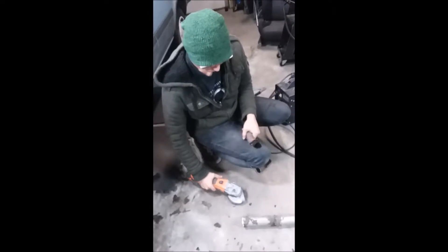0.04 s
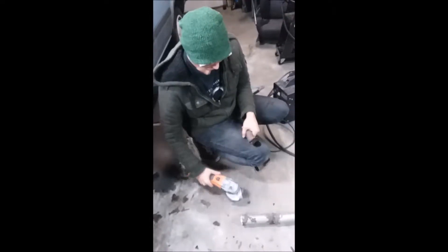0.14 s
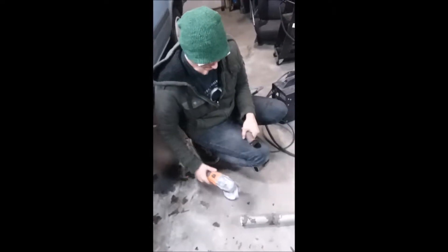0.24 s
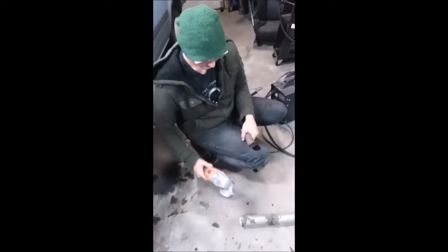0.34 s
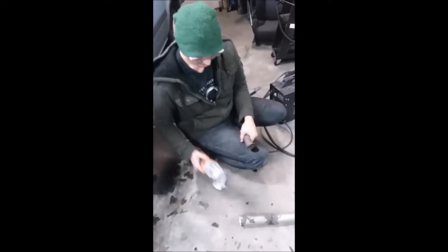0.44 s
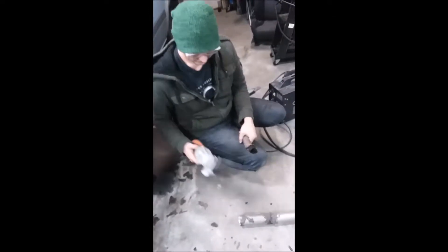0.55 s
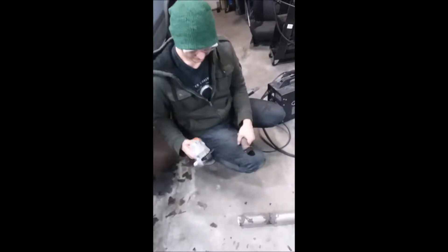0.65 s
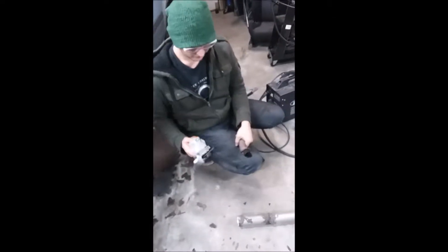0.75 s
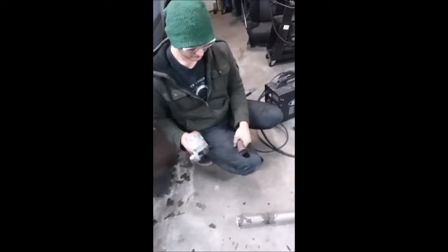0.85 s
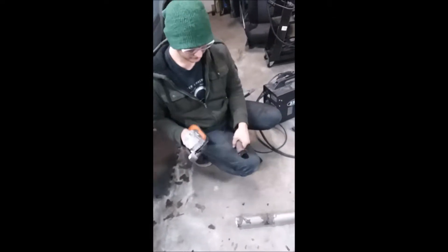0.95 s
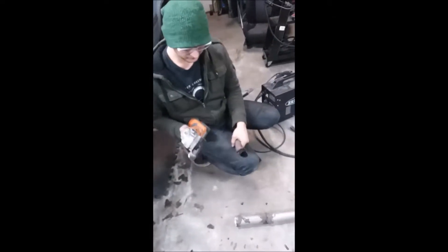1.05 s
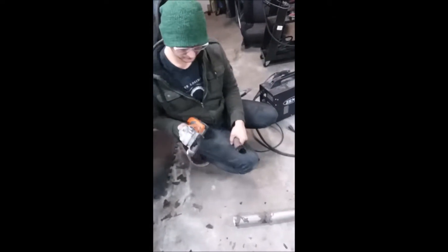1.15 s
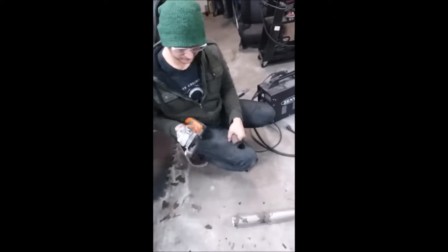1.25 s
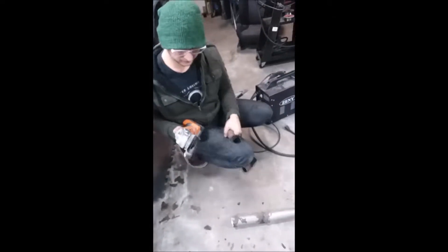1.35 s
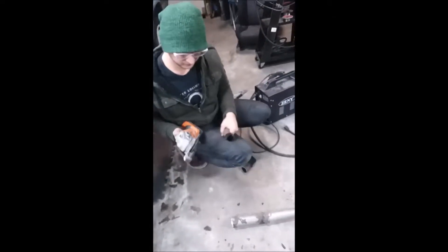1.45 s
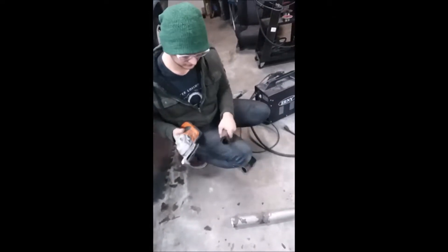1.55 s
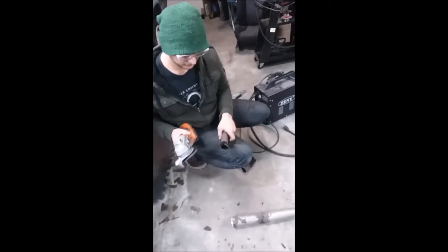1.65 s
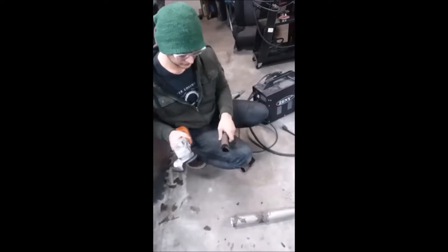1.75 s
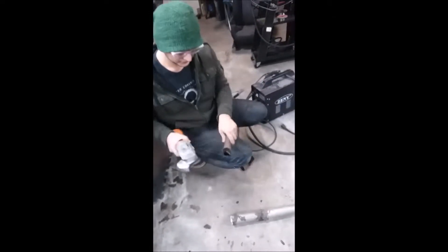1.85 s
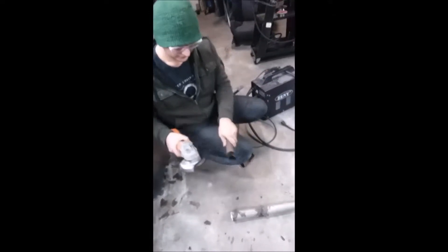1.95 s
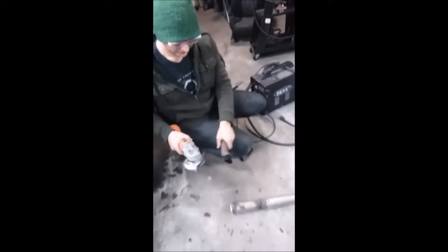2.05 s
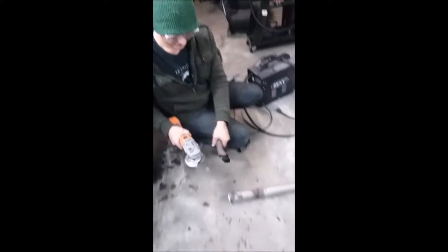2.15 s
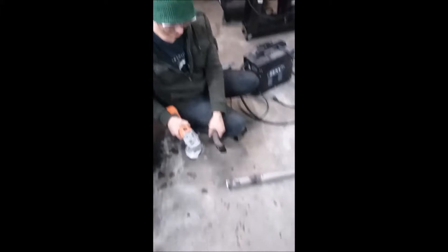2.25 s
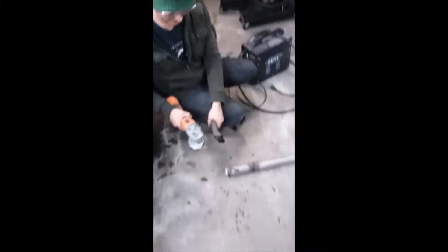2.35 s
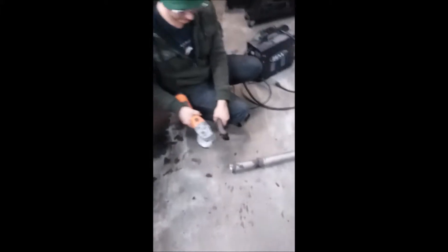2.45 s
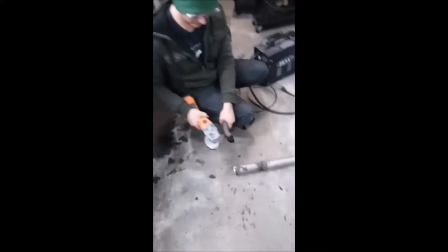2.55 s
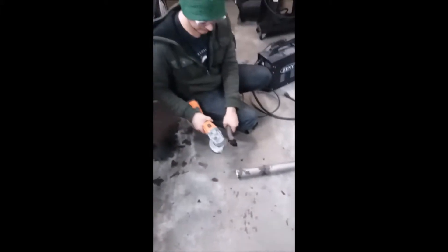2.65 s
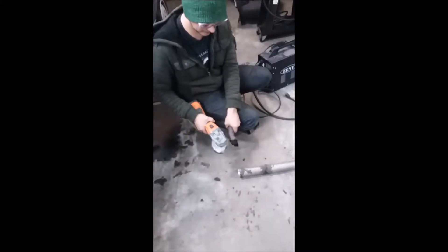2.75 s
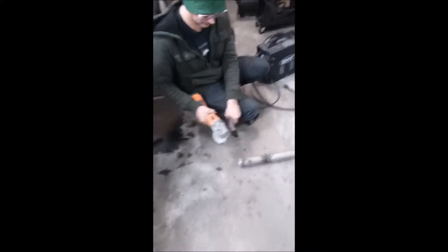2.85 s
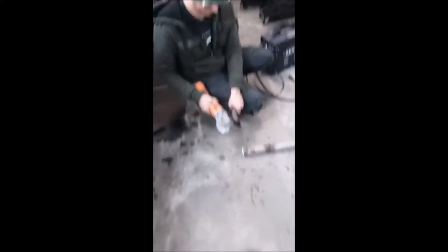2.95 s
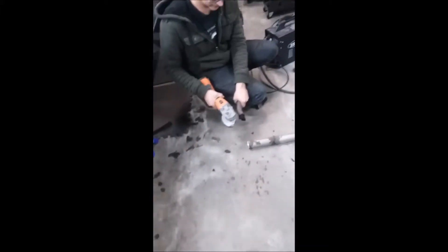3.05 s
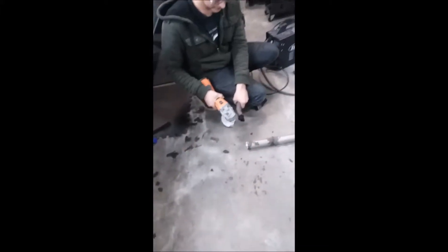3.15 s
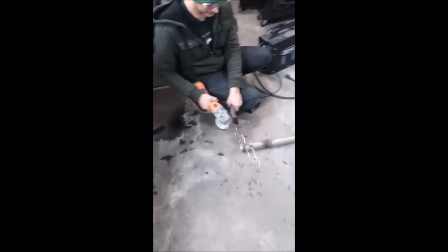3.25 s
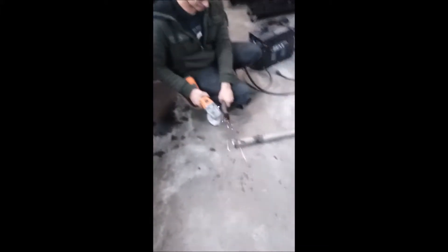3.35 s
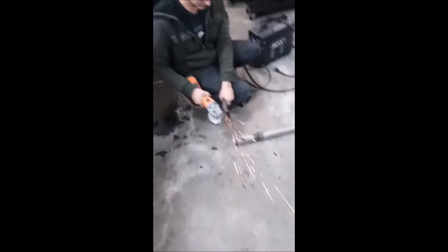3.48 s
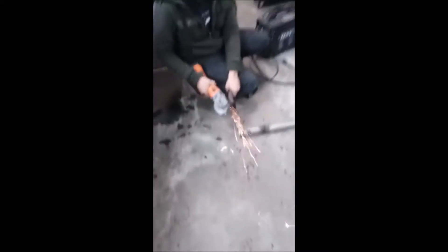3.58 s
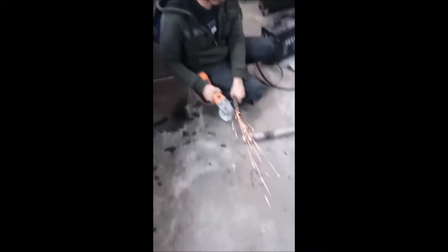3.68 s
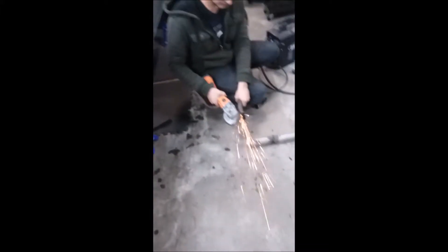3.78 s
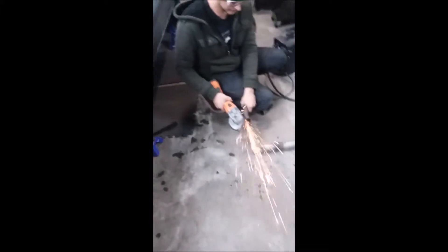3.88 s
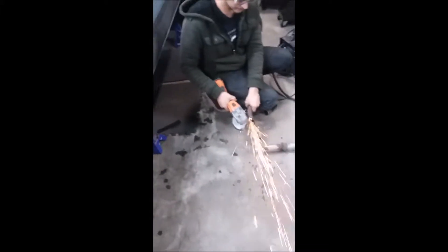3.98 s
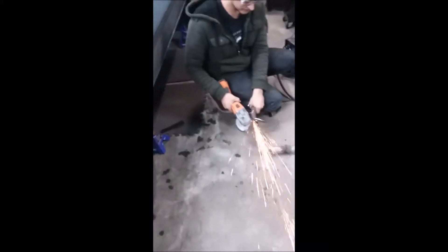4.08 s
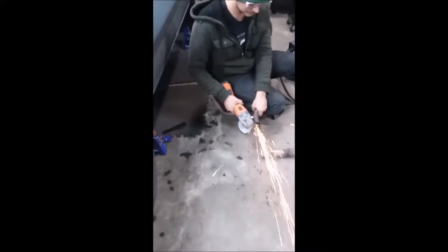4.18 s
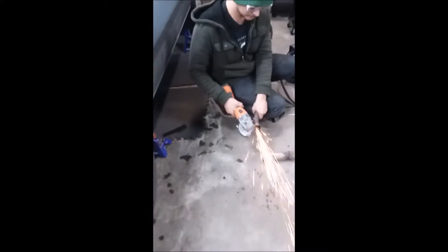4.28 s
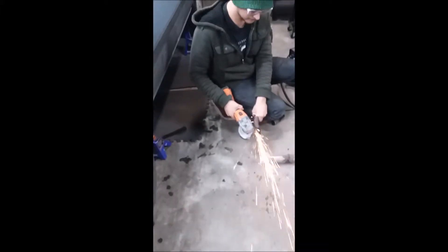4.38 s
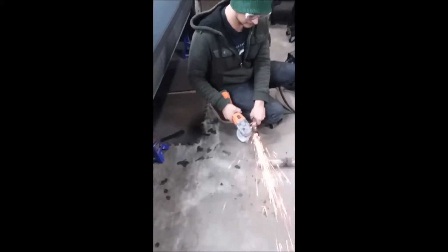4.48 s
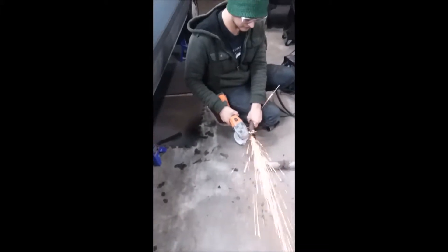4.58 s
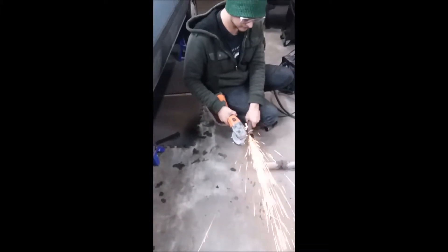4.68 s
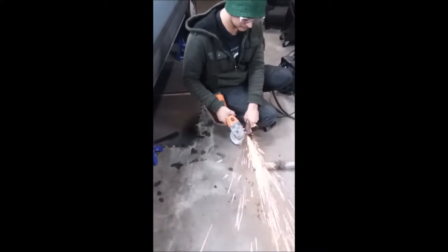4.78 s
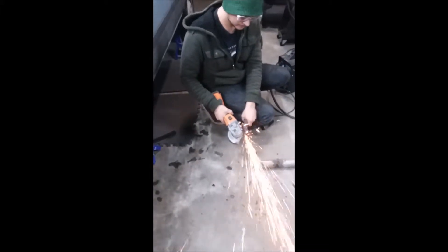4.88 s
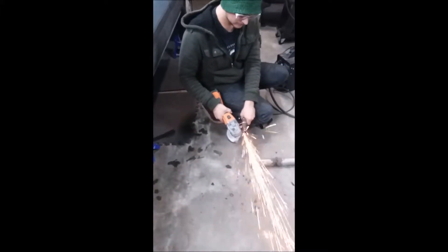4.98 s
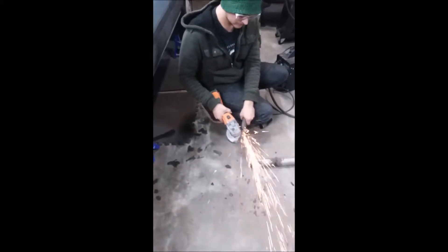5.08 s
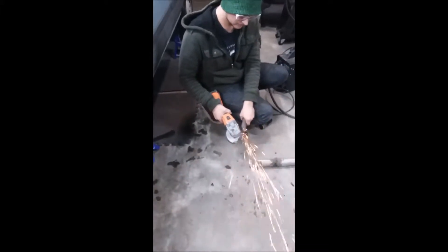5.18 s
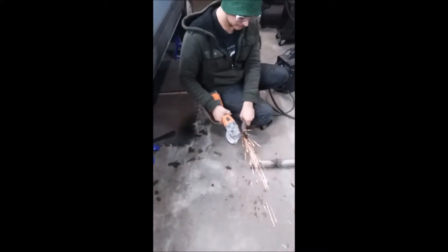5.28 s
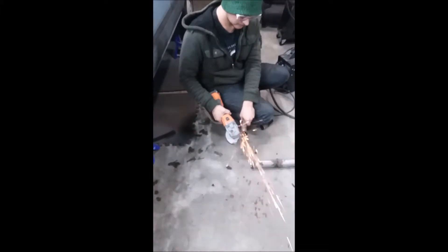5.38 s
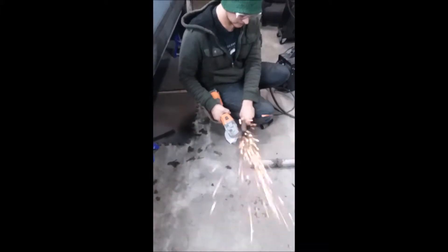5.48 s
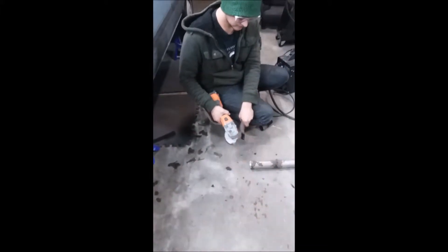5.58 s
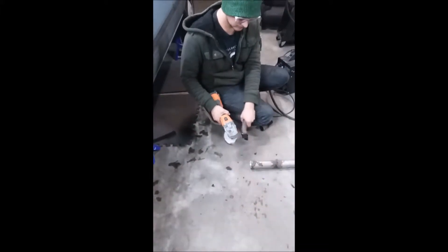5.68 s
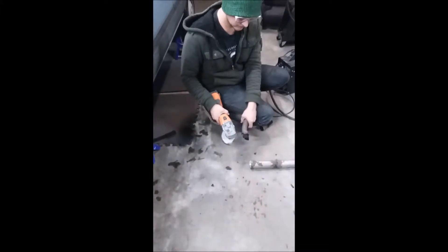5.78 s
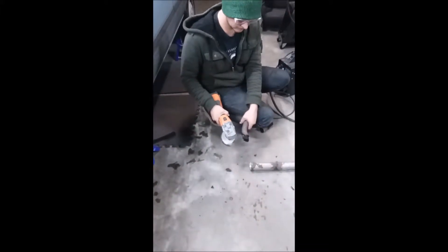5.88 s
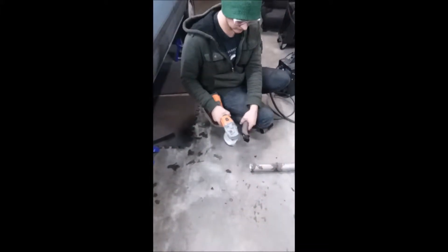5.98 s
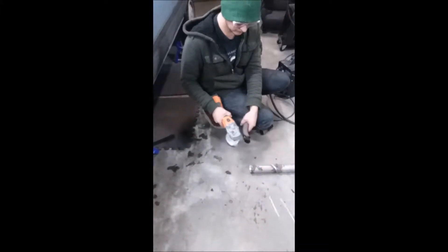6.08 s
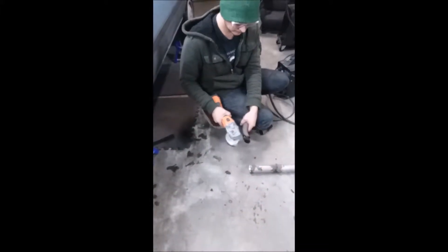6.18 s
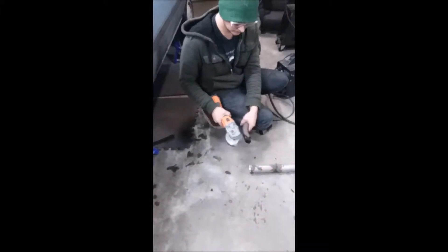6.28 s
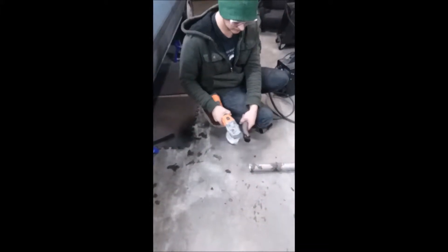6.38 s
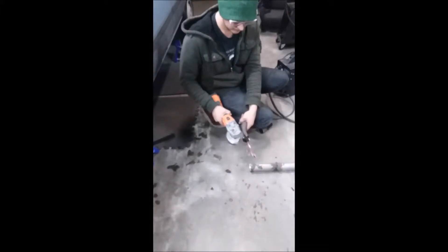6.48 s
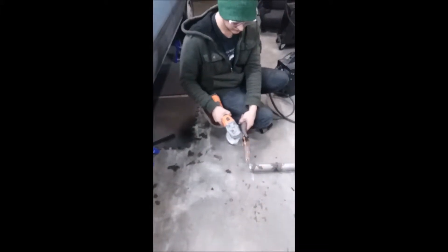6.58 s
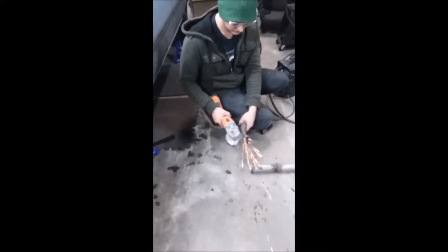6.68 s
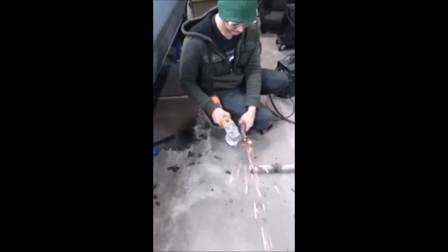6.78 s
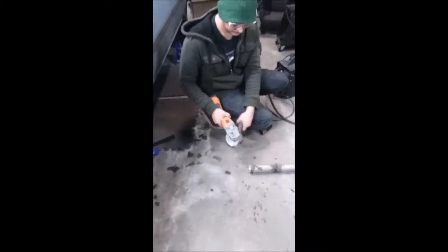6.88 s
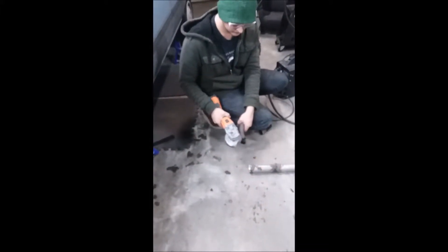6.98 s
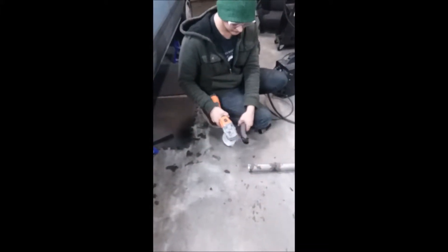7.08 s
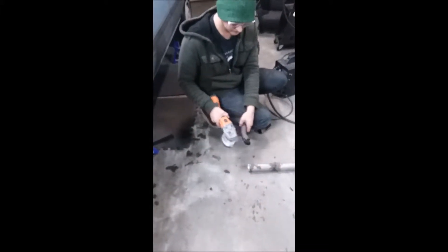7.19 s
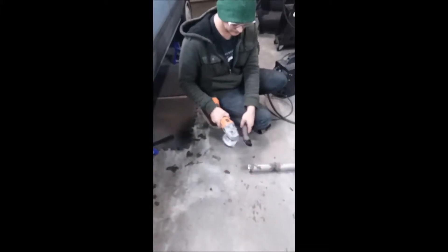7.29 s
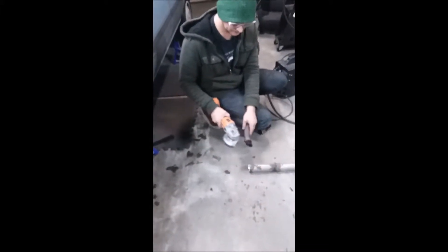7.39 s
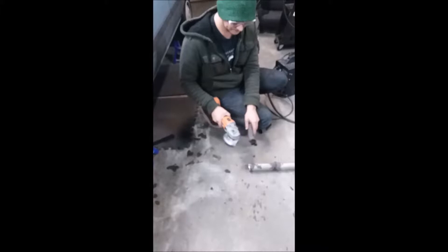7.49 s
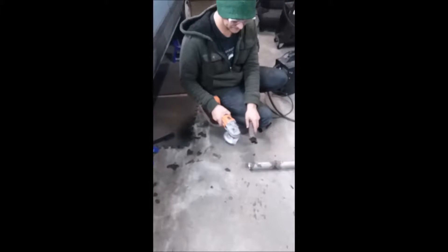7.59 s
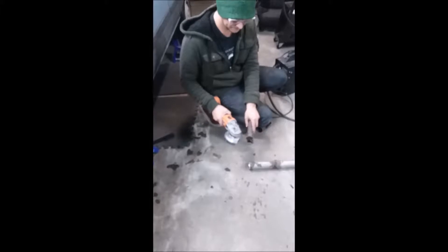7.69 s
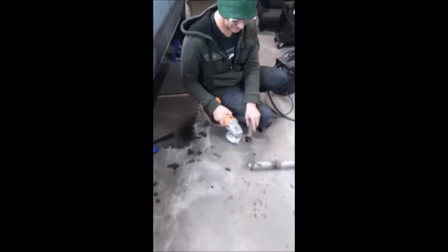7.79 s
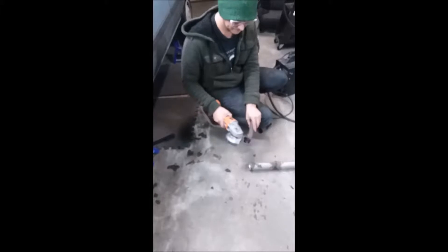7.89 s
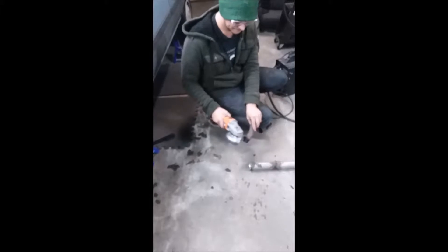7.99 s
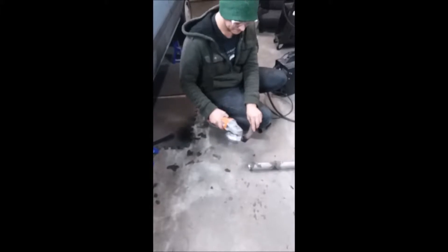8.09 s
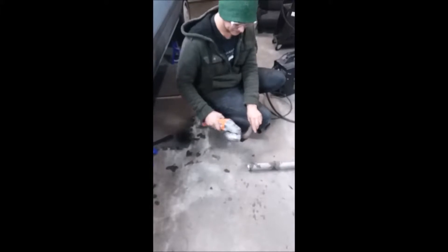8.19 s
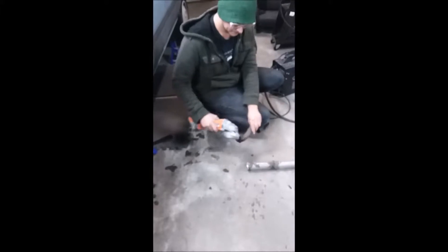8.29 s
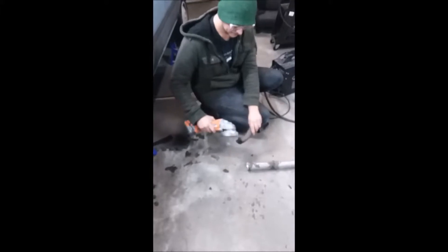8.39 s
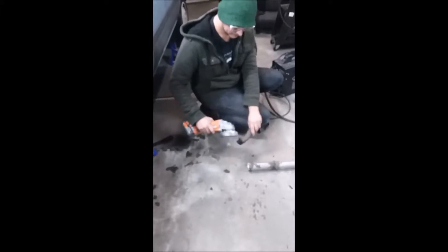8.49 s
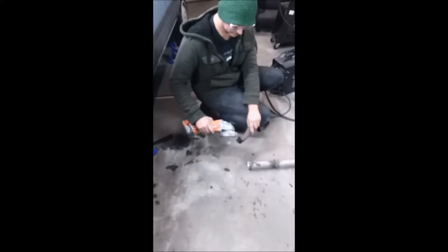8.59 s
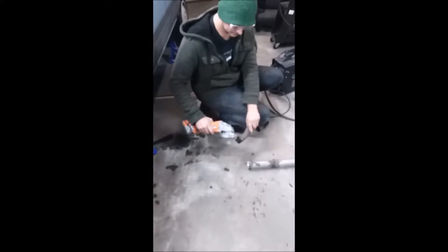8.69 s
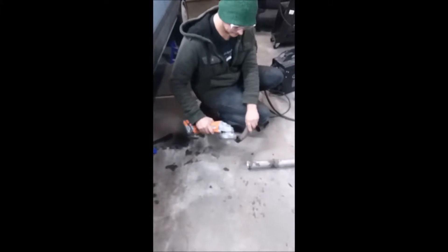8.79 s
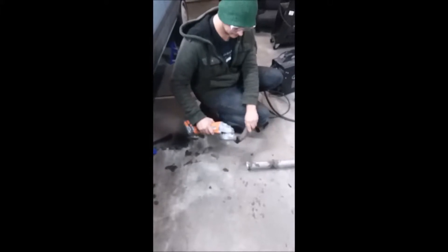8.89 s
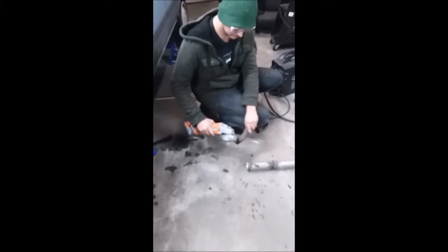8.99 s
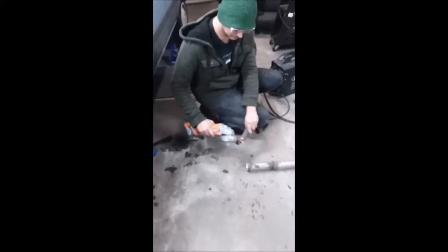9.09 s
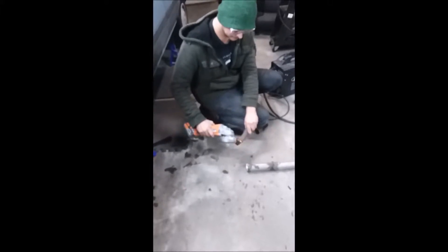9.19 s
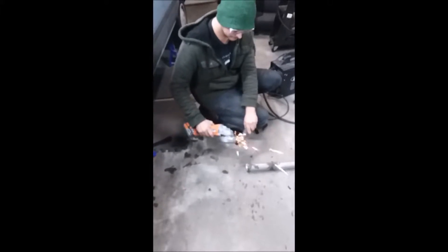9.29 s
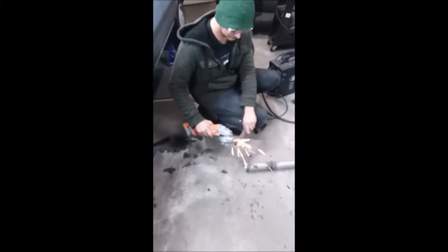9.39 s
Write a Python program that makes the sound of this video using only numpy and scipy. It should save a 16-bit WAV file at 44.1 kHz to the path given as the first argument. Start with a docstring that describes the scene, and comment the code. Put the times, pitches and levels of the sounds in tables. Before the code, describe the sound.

In a workshop with a short room decay, faint rumble and soft sleeve rubs precede sharp switch clicks. An electric angle grinder howls up to speed and settles into whine, rushing air and gear rattle. It grinds steel pipe in one long rasp, a brief touch and a last pass at the end. Close stereo microphone; sparks and air buffet the right side.

```python
"""In a workshop, two microphone ports hear an angle grinder picked up, switched on and pressed three times to steel pipe.
Fan, slot and gear tones follow the motor's turns; filtered noise makes the rushing air, and backlash knocks
excite the gear head. On the pipe the speed sags, and a noise pattern nearly alike on every disc turn
makes the grit rasp and rings disc and pipe. The stream of sparks and air buffets the right port alone.
Cloth rubs, clicks, a low hum and faint rumble open the scene."""
import sys
import numpy as np
from scipy import signal
from scipy.fft import rfft, irfft, next_fast_len
from scipy.io import wavfile

SR = 44100
rng = np.random.default_rng(int(sys.argv[2]) if len(sys.argv) > 2 else 0)


def wav_out(sig):
    """Save sig, one row per channel (or a flat mono array), as 16-bit PCM at SR to the path in sys.argv[1]."""
    wavfile.write(sys.argv[1], SR, np.round(np.clip(np.atleast_2d(sig).T, -1, 1) * 32767).astype(np.int16))


N = 416304
TIME = np.arange(N) / SR  # [s]
GEAR_RATIO = 13 / 37  # disc turns per motor turn


def from_db(db):
    """Decibels to gain."""
    return 10 ** (np.asarray(db) / 20)


def rms_one(x):
    """Scale to unit power."""
    return x / np.sqrt(np.mean(x ** 2) + 1e-20)


def in_time(rows):
    """Interpolate the columns of a timed table at every sample."""
    s, *columns = np.transpose(rows)
    return [np.interp(TIME, s, column) for column in columns]


def gate(start, end, edge=0.005):
    """One between two moments [s], with short ramps."""
    rise = np.clip((TIME - start) / edge, 0, 1)
    fall = np.clip((end - TIME) / edge + 1, 0, 1)
    return rise * fall


def drift(rate_hz):
    """Slow chance with unit spread: noise through two equal low-pass poles, computed every 40 samples."""
    step = 40
    pole = np.exp(-2 * np.pi * rate_hz * step / SR)
    noise = rng.standard_normal(N // step + 2002)
    slow = signal.lfilter([1], [1, -2 * pole, pole * pole], noise)[2000:]  # skip the settling
    return np.interp(np.arange(N) / step, np.arange(len(slow)), rms_one(slow))


def colour(x, spectrum):
    """Filter by a (frequency [Hz], level [dB]) outline, straight on a logarithmic frequency axis."""
    hz, db = np.transpose(spectrum)
    size = next_fast_len(N)
    bins_hz = np.maximum(np.arange(size // 2 + 1) * SR / size, 1)
    gain = from_db(np.interp(np.log(bins_hz), np.log(hz), db))
    return irfft(rfft(x, size) * gain, size)[..., :N]


def resonate(x, modes):
    """Parallel resonances, each applied twice for steep skirts."""
    out = 0
    for hz, width_hz, db in modes:
        r = np.exp(-2 * np.pi * width_hz / SR)
        edge = (1 - r * r) / 2
        section = [edge, 0, -edge, 1, -2 * r * np.cos(2 * np.pi * hz / SR), r * r]
        out = out + from_db(db) * signal.sosfilt([section, section], x + 1e-18)
    return out


def bursts(events, decay_s):
    """An envelope that jumps at each event and dies away exponentially."""
    kicks = np.zeros(N)
    for s, db in events:
        kicks[round(s * SR)] = from_db(db)
    return signal.lfilter([1], [1, -np.exp(-1 / (decay_s * SR))], kicks + 1e-18)


def swells(events):
    """An envelope that rises and falls like a bell around each event."""
    return sum(from_db(db) * np.exp(-((TIME - s) / half_s) ** 2) for s, half_s, db in events)


def pan(x, left_db):
    """Level tilt between the ports, left minus right."""
    return x * from_db([[left_db / 2], [-left_db / 2]])


def balance(x, outline):
    """Level tilt between the ports, band by band."""
    ports = []
    for port, side in zip(x, (1, -1)):
        tilt = [(hz, side * db / 2) for hz, db in outline]
        ports.append(colour(port, tilt))
    return np.array(ports)


ROOM_T60_S, ROOM_DB = 0.29, -0.5  # decay time; base tail level against the direct sound, before wet_db


def workshop(x, wet_db=0.0, late_samples=4):
    """Direct sound reaches the left port a few samples late; each port gets its own diffuse, decaying tail."""
    t = TIME[:SR // 2]
    tail = rng.standard_normal((2, len(t))) * from_db(-60 * t / ROOM_T60_S) * (t > .003)
    response = from_db(ROOM_DB + wet_db) * rms_one(tail) / np.sqrt(len(t))
    response[0, late_samples] += 1
    response[1, 0] += 1
    return signal.oaconvolve(x[None], response, axes=1)[:, :N]


# the free motor gains speed evenly, levels off, and creeps up a little as the grease warms
SWITCH_ON_S = 1.34
FREE_TURNS_PER_S, ACCELERATION_TURNS_PER_S2, KNEE_SHARPNESS = 336.55, 742, 7.8
COLD_LOSS_TURNS_PER_S, WARM_UP_S = 5.9, 1.9
INERTIA_S = .06  # time constant with which the speed follows the drag of the work


def motor_speed(drag):
    """Turns per second without load, and the turns per second lost to the work after inertia smooths the drag."""
    running_s = np.maximum(TIME - SWITCH_ON_S, 0)
    top = FREE_TURNS_PER_S - COLD_LOSS_TURNS_PER_S * np.exp(-running_s / WARM_UP_S)
    ramp = ACCELERATION_TURNS_PER_S2 * running_s / top
    free = top * ramp / (1 + ramp ** KNEE_SHARPNESS) ** (1 / KNEE_SHARPNESS)
    keep = np.exp(-1 / (INERTIA_S * SR))
    sag = signal.lfilter([1 - keep], [1, -keep], drag)
    return free, sag


def tone(turns, order, flutter_db, wobble):
    """One multiple of the motor speed, wavering a little differently at each port."""
    phase = 2 * np.pi * order * turns + wobble * drift(21)
    ports = [np.sin(phase + 0.84 * drift(4.3)) * from_db(flutter_db * drift(7.3)) for port in range(2)]
    return np.sqrt(2) * np.array(ports)


# fan whine at 8 times motor speed, its level uneven over time, before gain and speed:
# (time [s], level [dB])
FAN_WHINE = [(1.8, -31), (1.876, -18.5), (2.256, -43), (2.43, -24), (2.64, -32), (2.78, -24),
             (3.026, -30.5), (3.25, -33), (5.65, -47.5), (6.72, -33.5), (7.15, -36), (7.18, -40.5),
             (8.21, -27.5), (8.74, -38.5), (9.0, -31.5), (9.15, -56), (9.248, -30), (9.44, -33.5)]
# its lower octave at 4 times motor speed, before gain and speed: (time [s], level [dB])
LOWER_FAN_WHINE = [(1.82, -29.5), (2.14, -29), (2.29, -46), (2.37, -24), (3.69, -48.5), (6.17, -45.5),
                   (6.96, -32), (7.57, -53.5), (8.91, -32.5), (9.44, -43.5)]
# other motor and gear tones: (multiple of motor speed, level against the air gain at full speed [dB])
MOTOR_ORDERS = [(.76, -28.5), (2, -13), (2.74, -9.5), (13, -3.5), (14, -18), (16, -3.5), (37, -25),
                (39, -28), (41, -37), (43, -31)]
WHINE_GAIN_DB, LOWER_WHINE_GAIN_DB = 2.5, -5.5
WHINE_DB_PER_LOST_TURN = -0.44  # dB for each turn per second lost to the work


def whine(turns, speed, sag, air):
    """Fan, slot and gear tones; the fan's two rise steeply with speed and fade when the motor labours."""
    pace = speed / speed.max()
    eighth = from_db(in_time(FAN_WHINE)[0] + WHINE_GAIN_DB) * pace ** 8
    fourth = from_db(in_time(LOWER_FAN_WHINE)[0] + LOWER_WHINE_GAIN_DB) * pace ** 3
    fan = fourth * tone(turns, order=4, flutter_db=6.5, wobble=0.4)
    fan = fan + eighth * tone(turns, order=8, flutter_db=1.0, wobble=0.16)
    rest = sum(from_db(db) * tone(turns, order, flutter_db=4.5, wobble=0.67) for order, db in MOTOR_ORDERS)
    return pan(fan * from_db(WHINE_DB_PER_LOST_TURN * sag) + air * rest * pace ** 6, left_db=0.5)


# outline of the cooling air before scaling: (frequency [Hz], level [dB per Hz])
AIR_SPECTRUM = [(30, -52), (60, -38), (130, -23.5), (250, -12.5), (420, -3.5), (700, -1.5), (1150, 5),
                (1900, 3), (2700, 2), (3700, 6.5), (5400, -7.5), (6800, -15), (9000, -21), (13000, -11),
                (16000, -15)]
# air at the two ports: (frequency [Hz], left minus right [dB])
AIR_PORT_BALANCE = [(500, -4.5), (1300, -7), (2500, -1), (4500, -4), (6500, 13.5), (8000, 14.5),
                    (10000, 0.5), (15000, -5)]
AIR_TOP_HZ = 6200  # the hiss above this grows most with speed


def air_rush(turns, speed, air):
    """Cooling air torn by the fan, throbbing lightly with rotor and disc; its top hiss grows with speed."""
    throb = 1 + 0.038 * np.cos(2 * np.pi * turns) + 0.18 * np.cos(2 * np.pi * GEAR_RATIO * turns)
    bright = rms_one(colour(rng.standard_normal(N), AIR_SPECTRUM))
    dull = colour(bright, [(AIR_TOP_HZ, 0), (1.5 * AIR_TOP_HZ, -12)])
    hiss = dull + (bright - dull) * (speed / speed.max()) ** 2
    rush = hiss * throb * from_db(1.0 * drift(33))
    return balance(workshop(from_db(5.5) * air * rush), AIR_PORT_BALANCE)


# resonances of the gear head: (frequency [Hz], width [Hz], level [dB])
GEAR_HEAD_MODES = [(2686, 350, 6.5), (3760, 100, 2), (3962, 530, 12), (4387, 260, 5.5), (4644, 550, 5),
                   (4880, 490, -4)]


def gear_rattle(turns, level, knock_s=0.0015, slop=.14):
    """With backlash the teeth knock unevenly about once a disc turn, each a short chatter in the gear head."""
    swing = np.maximum.accumulate(np.floor(GEAR_RATIO * turns + slop * drift(45)))
    knocks = np.diff(swing, prepend=swing[0]) * rng.uniform(.3, 1.3, N)
    knocks += (rng.random(N) < 25 / SR) * 1.02  # stray rebounds, 25 a second on average
    decay = np.exp(-1 / (knock_s * SR))
    chatter = np.tanh(signal.lfilter([1], [1, -decay], knocks + 1e-18)) + .05
    head = rms_one(resonate(chatter * rng.standard_normal(N), GEAR_HEAD_MODES))
    head = 4 * np.tanh(head / 4)  # the free play of the teeth limits how hard the head can be driven
    head = signal.sosfilt(signal.butter(4, 6500, fs=SR, output="sos"), head)
    return pan(workshop(from_db(1.5) * level * head, wet_db=-4.0), left_db=-16.5)


# disc on steel, one table for each pass, levels before mixing:
# (time [s], drag [motor turns per s], grit hiss [dB], ringing of disc and pipe [dB])
STEEL_PASSES = [
    [(3.26, 0, -44, -56), (3.44, 3.5, -29.5, -28), (3.66, 16, -28.5, -21.5), (3.82, 25.5, -27, -28.5),
     (4.2, 24, -29.5, -26.5), (4.72, 30, -30.5, -25.5), (4.97, 29.5, -32, -26.5), (5.22, 21.5, -33, -29.5),
     (5.56, 16, -31, -28.5)],
    [(6.53, 0, -44, -41), (6.62, 3.5, -33.5, -28), (6.82, 9, -27, -22.5), (6.96, 1.5, -43, -34.5)],
    [(9.04, 2, -33, -31), (9.44, 5.9, -35.5, -25.5)],
]


def spells():
    """Drag, hiss gain and ringing gain of the passes, each acting only within its own span."""
    out = 0
    for rows in STEEL_PASSES:
        drag, hiss_db, ringing_db = in_time(rows)
        columns = np.array([drag, from_db(hiss_db), from_db(ringing_db)])
        out = out + columns * gate(rows[0][0], rows[-1][0])
    return out


def disc_face(turns, memory, lumpy_db, fresh, size=400, order=4):
    """Grit passing the steel: the same rim returns each turn, slowly worn into a new one, plus fresh fractures."""
    angle = GEAR_RATIO * turns  # disc turns
    rims = rng.standard_normal((int(angle[-1]) + 200, size))
    rims = signal.lfilter([1], [1, -min(memory, .99)], rims, axis=0)
    high_spots = rms_one(signal.resample(rng.standard_normal(size // 25), size))
    rims = rims * from_db(lumpy_db * high_spots)
    track = signal.resample_poly(rims.ravel(), order, 1)
    rasp = np.interp(angle * size * order, np.arange(len(track)), track)
    return (rms_one(rasp) + fresh * rng.standard_normal(N)) * (1 + 0.093 * np.cos(2 * np.pi * angle))


# the disc bites or skips on the steel, mostly as it touches down, before the spray and ring gains:
# (time [s], peak [dB])
DISC_BITES = [(3.2575, -18.5), (3.3085, -21), (3.3328, -20), (3.3717, -22), (3.614, -30.5), (6.13, -24),
              (6.536, -21.5), (6.59, -22), (6.912, -22), (6.9343, -17.5), (9.1114, -22), (9.284, -29)]
# outline of the grit hiss before scaling: (frequency [Hz], level [dB per Hz])
GRIT_SPECTRUM = [(300, -8.5), (1000, -2.5), (2200, -4), (5500, -1), (7000, 0), (8800, -7.5), (10200, 5),
                 (12400, 9), (13500, 5.5), (15000, 9.5), (16000, 4.5)]
# resonances of disc and pipe in contact: (frequency [Hz], width [Hz], level [dB])
DISC_AND_PIPE_MODES = [(2860, 180, -4), (3372, 194, 2), (3540, 125, 0), (3957, 217, -0.5), (4440, 79, -15),
                       (5100, 58, -8.5)]
# grit spray at the two ports: (frequency [Hz], left minus right [dB])
GRIT_PORT_BALANCE = [(1000, -13.5), (5000, -23), (7500, 9.5), (9000, 5), (11000, 1.5), (12500, -3),
                     (15000, -6)]
BITE_S, BITE_SPRAY_DB, BITE_RING_DB = .0045, -4.0, -1.0  # decay; gains of a bite in hiss and ringing


def grinding(turns, hiss, ringing):
    """The grit hisses directly and sets disc and pipe ringing; bites and skips are short hard bursts."""
    bite = bursts(DISC_BITES, decay_s=BITE_S)
    grit = rms_one(colour(disc_face(turns, memory=0.8, lumpy_db=4.0, fresh=0.43), GRIT_SPECTRUM))
    face = disc_face(turns, memory=0.933, lumpy_db=3.5, fresh=0.39)
    body = rms_one(resonate(face, DISC_AND_PIPE_MODES))
    spray = workshop(grit * (from_db(-1.0) * hiss + from_db(BITE_SPRAY_DB) * bite))
    ring = workshop(body * (ringing + from_db(BITE_RING_DB) * bite))
    return balance(spray, GRIT_PORT_BALANCE) + pan(ring, left_db=-5.0)


# tones that strain out during spin-up, before housing and effort: (multiple of motor speed, level [dB])
STRAIN_ORDERS = [(2, -23), (4, -43), (12, -39), (13, -29), (14, -35), (15, -28.5), (26, -24), (32, -19)]
# how well the housing radiates, for the howl here and the brushes below: (frequency [Hz], level [dB])
HOUSING_RADIATION = [(250, -38), (600, -6), (1200, -24), (2000, 14.5), (2650, 11), (3100, 10.5), (3800, 14),
                     (5200, 4.5), (7000, -3.5), (8500, -26)]
HOWL_DB = -6  # gain at full torque and speed


def spin_up(turns, speed, torque):
    """The gears howl roughly while they accelerate the disc; the higher multiples waver most."""
    howl = 0
    for order, db in STRAIN_ORDERS:
        level = from_db(db + 3.1 * drift(56))
        howl = howl + level * np.sin(2 * np.pi * order * turns + 0.1 * order * drift(34))
    effort = from_db(HOWL_DB) * torque ** 0.39 * (speed / speed.max()) ** 1.84
    return pan(workshop(colour(howl, HOUSING_RADIATION) * effort), left_db=-7.0)


INRUSH_DB, INRUSH_BUZZ, MAINS_HZ = -37, 0.3, 60  # dry level at full torque; depth of the mains pulsing


def inrush(torque):
    """The starting current makes the brushes rasp through the housing, pulsing twice in each mains cycle."""
    sparks = rng.standard_normal(N) * (1 + INRUSH_BUZZ * np.cos(4 * np.pi * MAINS_HZ * TIME))
    rasp = rms_one(colour(sparks, HOUSING_RADIATION)) * torque * from_db(INRUSH_DB)
    return pan(workshop(rasp, wet_db=0.5), left_db=-10.5)


# gusts when the spark stream points at the port, before gain: (time [s], half length [s], peak [dB])
PORT_GUSTS = [(3.275, 0.014, -36), (3.345, 0.01, -29.5), (3.54, 0.11, -37.5), (3.81, 0.2, -36.5),
              (4.41, 0.21, -37.5), (4.85, 0.24, -39), (5.18, 0.17, -37), (6.562, .02, -36),
              (6.9, 0.041, -33)]
# single hard puffs, before noise, filter and gain: (time [s], peak [dB])
PORT_PUFFS = [(3.266, -19), (3.335, -18), (3.577, -13.5), (3.735, -12.5), (3.781, -14.5), (4.35, -20),
              (4.398, -12), (4.497, -15.5), (4.782, -17), (5.137, -13), (5.2, -16)]
# outline of the gusts before scaling: (frequency [Hz], level [dB per Hz])
GUST_SPECTRUM = [(15, -45), (25, -26), (97, 0), (358, -10), (442, -10), (487, -15), (644, -8.5), (700, -17),
                 (910, -20), (1540, -120)]


def buffeting():
    """Lumpy gusts and single puffs of pressure on the right microphone port alone."""
    lumpy = rng.standard_normal(N) * from_db(5.8 * drift(41))
    gusts = rms_one(colour(lumpy, GUST_SPECTRUM)) * swells(PORT_GUSTS)
    band = signal.butter(1, [90, 600], "band", fs=SR, output="sos")
    pressure = bursts(PORT_PUFFS, decay_s=0.0079) * (1 + 1.5 * rng.standard_normal(N))
    puffs = signal.sosfilt(np.vstack([band, band]), pressure)
    return (from_db(8.5) * gusts + from_db(4.5) * puffs) * np.array([[0], [1]])


# sleeve and hand rub as the tool is lifted, before flutter and room: (time [s], half length [s], peak [dB])
SLEEVE_RUBS = [(.03, 0.2, -80), (.69, 0.052, -74), (1.02, 0.34, -76.5)]
# clicks of housing and slide switch and the first jolt of the gears, before gain: (time [s], peak [dB])
TOOL_CLICKS = [(0.464, -65), (0.523, -55), (0.878, -54), (0.998, -57), (1.165, -44.5), (1.226, -27.5),
               (1.34, -30)]
# outlines of the rub and of the clicks before scaling: (frequency [Hz], level [dB per Hz])
CLOTH_SPECTRUM = [(290, -46), (500, -11), (1630, -14), (2760, 2), (6670, -6.5), (7360, -17), (8730, -28),
                  (15000, -13)]
CLICK_SPECTRUM = [(150, -28), (600, -39), (1500, -3), (3200, 12), (5000, 7), (8000, -8), (15000, -30)]


def handling():
    """Cloth rubs as swelling noise; plastic housing, switch and gears click as short noise bursts."""
    rub = rms_one(colour(rng.standard_normal(N), CLOTH_SPECTRUM)) * swells(SLEEVE_RUBS) * from_db(2.0 * drift(30))
    snap = bursts(TOOL_CLICKS, decay_s=0.0062) * rms_one(colour(rng.standard_normal(N), CLICK_SPECTRUM))
    return pan(workshop(rub + from_db(-9.5) * snap, wet_db=-6.5), left_db=-11.0)


# outline of the background rumble before scaling: (frequency [Hz], level [dB per Hz])
RUMBLE_SPECTRUM = [(15, -36), (25, -12), (53, -7), (86, 3.5), (128, 8), (163, 0), (363, -13.5), (415, -21),
                   (1630, -31), (3630, -33), (6540, -35), (15000, -41)]
HUM_HZ, HUM_DB = 72, -66.5  # level before the fade


def room_tone():
    """A low hum over faint rumble, partly shared by the ports, both sinking away in the first seconds."""
    noise = rng.standard_normal(N) + .5 * rng.standard_normal((2, N))
    hum = np.sqrt(2) * np.sin(2 * np.pi * HUM_HZ * TIME + 0.28 * drift(2))
    fading = from_db(in_time([(0, 3), (.6, -1), (2.4, -3.5), (3.2, -32)])[0])  # (time [s], level [dB])
    rumble = from_db(-67.5) * rms_one(colour(noise, RUMBLE_SPECTRUM))
    return fading * (rumble + from_db(HUM_DB) * hum)


# running noise as the tool is moved about, before gains, load and speed:
# (time [s], air rush [dB], gear rattle [dB])
RUNNING_NOISE = [(1.85, -38, -30), (3.07, -33.5, -35.5), (3.5, -39.5, -41), (5.17, -39, -34.5),
                 (5.99, -44.5, -39.5), (6.73, -38.5, -34), (7.09, -43, -36.5), (8.66, -37, -31.5),
                 (9.44, -40.5, -33.5)]
# gain when running free; change under full load; growth with speed
AIR_DB, AIR_LOAD_DB, AIR_SPEED_POWER = -0.5, -3, 0.24
RATTLE_DB, RATTLE_LOAD_DB, RATTLE_SPEED_POWER = 1.22, -2.5, 0.33
FULL_LOAD_HISS_DB = -20  # grit hiss in the pass tables that counts as full load


def scene():
    """Motor speed times every part of the tool; load quietens the air and presses the gear teeth together."""
    drag, hiss, ringing = spells()
    free, sag = motor_speed(drag)
    speed = free - sag
    turns = np.cumsum(speed) / SR
    pace = speed / speed.max()
    pull = np.gradient(free).clip(0)
    torque = pull / pull.max()
    load = np.clip(hiss / from_db(FULL_LOAD_HISS_DB), 0, 1)
    on = gate(SWITCH_ON_S, TIME[-1])
    air_db, rattle_db = in_time(RUNNING_NOISE)
    air = on * from_db(air_db + AIR_DB + AIR_LOAD_DB * load) * pace ** AIR_SPEED_POWER
    rattle = from_db(rattle_db + RATTLE_DB + RATTLE_LOAD_DB * load) * pace ** RATTLE_SPEED_POWER
    tool = whine(turns, speed, sag, air * from_db(-2.5 * load))
    tool += air_rush(turns, speed, air) + gear_rattle(turns, rattle)
    tool += grinding(turns, hiss, ringing)
    tool += spin_up(turns, speed, torque) + inrush(torque)
    return tool + buffeting() + handling() + room_tone()


def record(dry):
    """A steep elliptic low-pass cuts the top above 15.7 kHz at both ports."""
    return signal.sosfilt(signal.ellip(10, .2, 80, 15700, fs=SR, output="sos"), dry)


dry = scene()
out = record(dry)
wav_out(out)
```